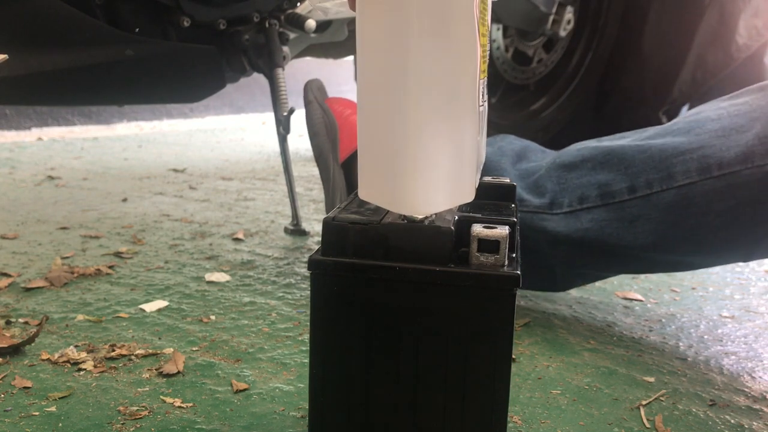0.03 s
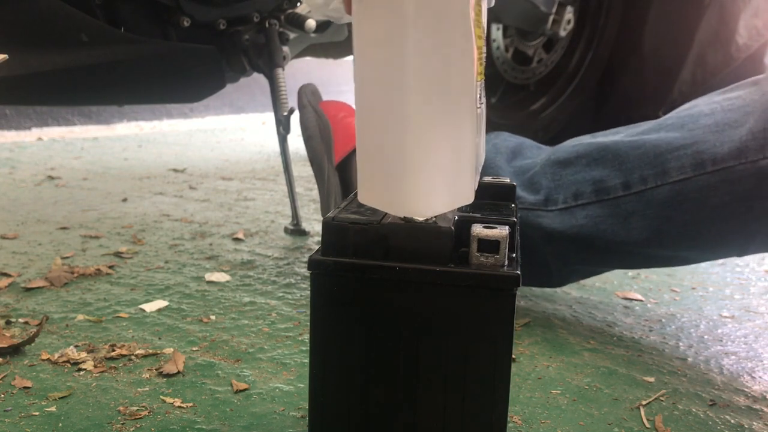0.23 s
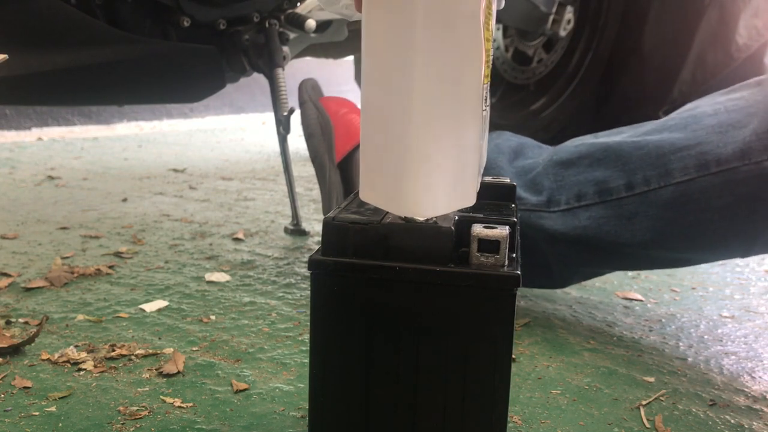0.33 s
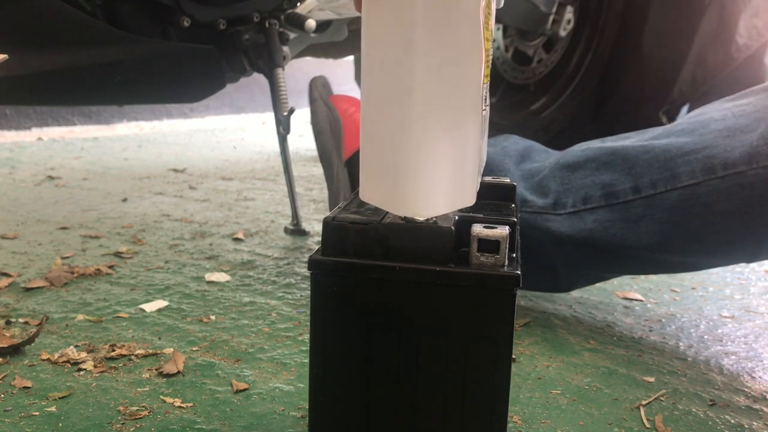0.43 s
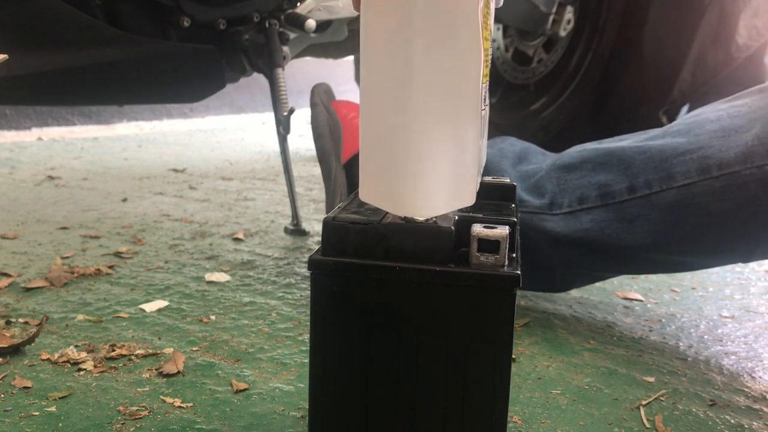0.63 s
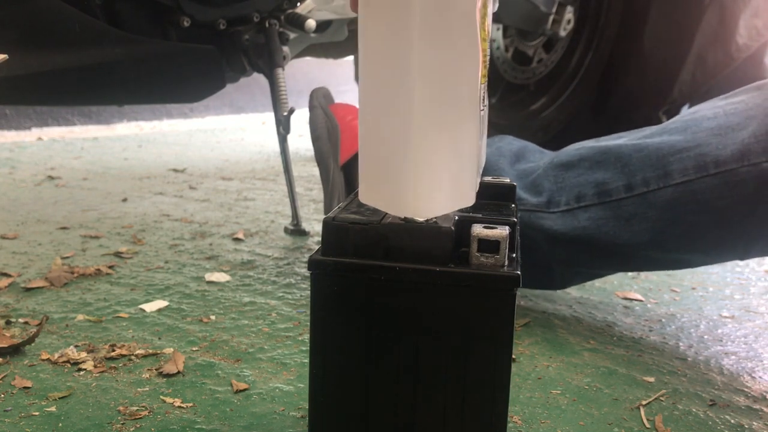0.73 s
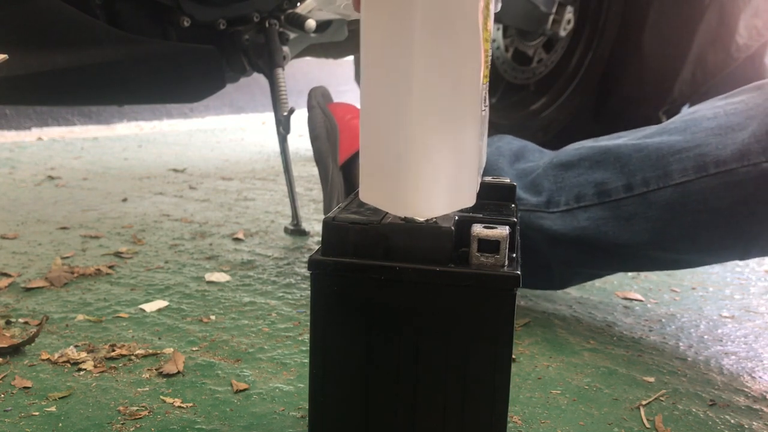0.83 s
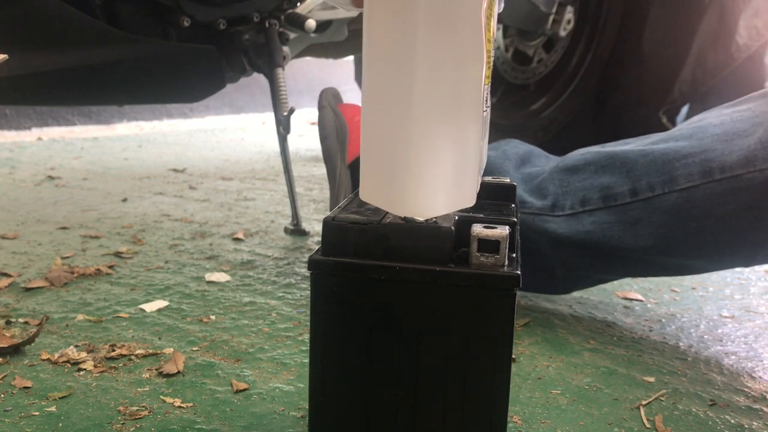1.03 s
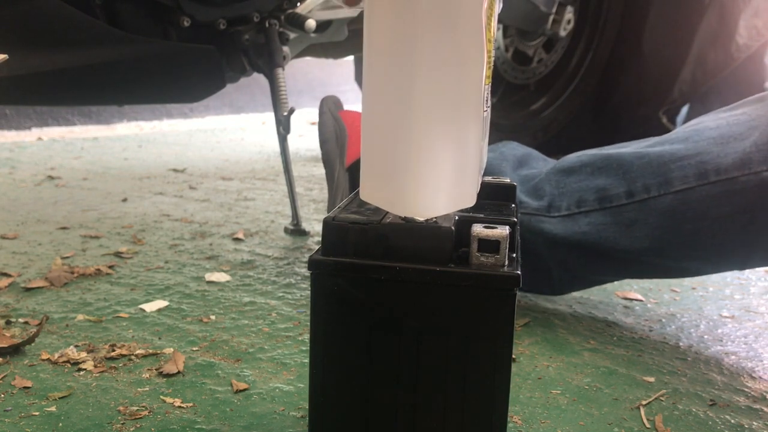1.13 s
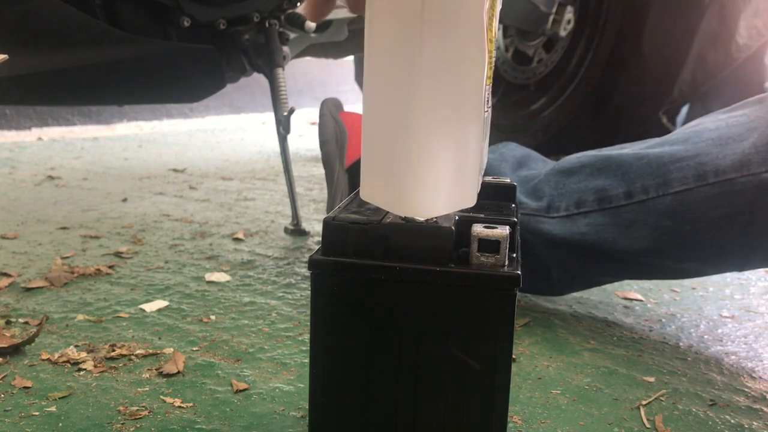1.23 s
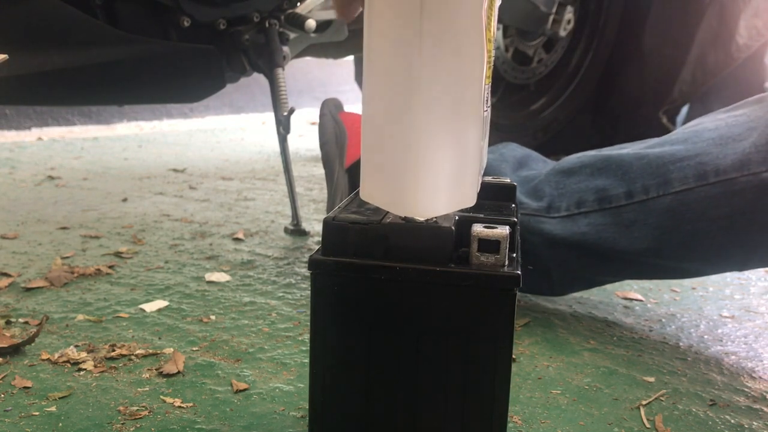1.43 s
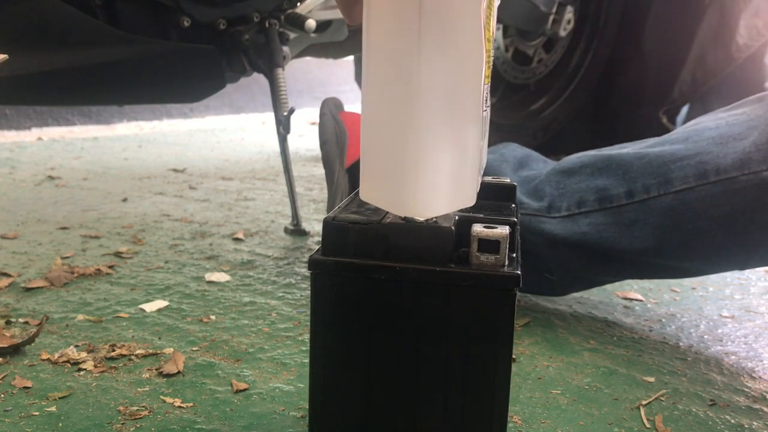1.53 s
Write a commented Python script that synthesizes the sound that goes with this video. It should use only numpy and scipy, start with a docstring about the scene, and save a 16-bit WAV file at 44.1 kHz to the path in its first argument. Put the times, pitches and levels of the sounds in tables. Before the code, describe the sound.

Foil seals burst with two sharp pops and thumps, followed by crackling, scraping plastic.

```python
"""Two foil seals pop as a plastic pack of acid bottles is pushed down onto a battery.
Each seal strains and rips, the hollow pack rings, and it drops with a thump.
Between and after the pops the plastic scrapes, snaps as it buckles and once faintly squeaks.
A small workshop adds a short echo; under it all lie a low rumble and dull handling noise."""
import sys
import numpy as np
from scipy import signal
from scipy.fft import rfft, irfft
from scipy.io import wavfile
from scipy.ndimage import uniform_filter1d

SR = 44100
rng = np.random.default_rng(int(sys.argv[2]) if len(sys.argv) > 2 else 0)


def bounce(signal):
    """Save signal as a 16-bit WAV file at the path given by the first command-line argument."""
    frames = np.transpose(np.atleast_2d(signal))
    limited = np.clip(frames, -1, 1)
    pcm = np.round(limited * 32767).astype(np.int16)
    wavfile.write(sys.argv[1], SR, pcm)


N = 70560

# Tone of the steady rumble and hiss: f/Hz, relative level/dB
RUMBLE_SPECTRUM = [(20, -41), (35, -11), (60, 1.5), (85, 1.5), (140, -4.5), (190, -11.5), (260, -12.5),
                   (330, -18.5), (450, -24.5), (870, -28), (1500, -32), (2100, -36), (4000, -40),
                   (6000, -44.5), (16000, -55.5)]
# Tone of the pack shifting in the hands: f/Hz, relative level/dB
HANDLING_SPECTRUM = [(30, -32), (80, -23.5), (120, 4), (280, -4.5), (500, -22.5), (1200, -32), (4000, -64)]
# How loud that shifting is over time: t/s, level/dB
HANDLING_LEVELS = [(0, -43), (.5, -39), (.62, -42), (.72, -88), (1.0, -35), (1.3, -39), (1.6, -38)]
# How long the room echoes: f/Hz, time to fade by 60 dB/s
ROOM_FADE_TIMES = [(100, 0.55), (400, 0.11), (1400, 0.32), (4200, 0.28), (8000, 0.22), (16000, 0.19)]
# Notes at which the hollow pack rings: f/Hz, relative level/dB, time to fade by 60 dB/s
PACK_NOTES = [(1170, -7, 0.067), (1327, -8, 0.02), (1470, 4, 0.037), (1706, -5, .03), (1925, 2.5, 0.075),
              (2592, -1, 0.11), (3434, -11.5, 0.12), (4210, -10, 0.057), (4720, -7, 0.026)]
# Tone of the scraping and snapping plastic: f/Hz, relative level/dB
PLASTIC_SPECTRUM = [(150, -23), (500, -19), (1200, -1), (2200, -3.5), (3300, 1), (4500, -2.5), (7000, -1.5),
                    (10000, -5.5), (16000, -13.5)]
# A bottle neck squeaks: t/s, length/s, f/Hz, band width/Hz, level/dB
NECK_SQUEAK = (1.41, .16, 4180, 170, -51)
# The pack slides: t/s, length/s, level/dB, extra treble/dB
SCRAPE_STROKES = [(0, 0.064, -41.5, 0), (0.38, 0.176, -56, -6), (0.53, 0.091, -43, 1),
                  (1.061, 0.147, -46.5, -1.5), (1.195, 0.161, -41, -10), (1.391, 0.18, -44.5, -7)]
# The plastic buckles: t/s, relative level/dB, f/Hz of the buckling spot, extra treble/dB
PLASTIC_SNAPS = [(.0055, -18, 1430, 3), (0.051, -34, 5760, 13), (0.3346, -17, 4430, -2),
                 (0.345, -28, 4650, 2), (0.5268, -30, 4460, -2), (0.5518, -20, 4700, 1),
                 (.5545, -23.5, 4400, 6), (0.579, -22.5, 4360, 3), (.604, -27, 3220, -9),
                 (0.617, -29.5, 4450, -6), (0.8919, -20, 4430, -3), (1.0209, -25, 4400, -12),
                 (1.046, -29.5, 1400, -10), (1.0505, -27.5, 1800, -6), (1.073, -30.5, 2650, -7.5),
                 (1.1121, -21, 5700, -5), (1.124, -25, 3380, 10), (1.1283, -23.5, 5670, -5),
                 (1.1602, -24.5, 5300, 4), (1.165, -28.5, 9000, 9), (1.1885, -18, 5830, 7),
                 (1.202, -17.5, 8000, 16), (1.2088, -18, 2960, -2), (1.2237, -9.5, 4300, 5),
                 (1.2524, -15.5, 6800, -2), (1.2559, -16, 6600, 16), (1.2653, -14.5, 3140, 5),
                 (1.2791, -18, 11300, -1), (1.2905, -20.5, 9500, 5), (1.3128, -18.5, 1370, 9),
                 (1.3226, -47, 6700, 6), (1.328, -15.5, 6840, 9), (1.3363, -14.5, 6700, 11),
                 (1.3415, -17.5, 6950, -12), (1.3456, -23, 4150, 1), (1.3878, -18, 3220, 4),
                 (1.4105, -44, 1400, -8), (1.424, -23, 5400, 6), (1.437, -37, 4000, 1),
                 (1.5004, -19.5, 5440, 1.5), (1.5555, -27, 4030, 0), (1.57, -28.5, 2660, -13.5),
                 (1.585, -32.5, 6750, 11)]
# The pack lands and knocks: t/s, level/dB, f/Hz, swell/s, decay/s
PACK_THUMPS = [(0.2199, -8, 239, 0.0015, 0.0028), (0.2371, -14.5, 160, 0.0016, .003),
               (.780, -13, 287, 0.00096, .0015), (.7998, -22, 200, 0.0014, 0.0021),
               (0.805, -20, 232, 0.00075, .002), (1.3173, -26.5, 287, 0.0022, 0.0042)]
# Tone of the tearing foil: f/Hz, relative level/dB
FOIL_SPECTRUM = [(100, -1.5), (380, -3), (600, -17), (880, -3.5), (1080, -10.5), (1350, 0.5), (1700, -5.5),
                 (2300, -6), (4300, 0), (5100, -4), (7500, -5), (11000, -10.5), (16000, -18.5)]
# The seals rip: t/s, length/s, level/dB, strain beforehand/s, strain level/dB, ring level/dB,
# treble tilt/(dB per octave). The strain and ring levels are relative to the rip.
SEAL_POPS = [(0.2103, 0.0098, -9.5, .012, -17.5, -11.5, 0.16), (0.7728, 0.0057, -8.5, .0065, -21, -16, 0.5)]

RUMBLE_DB, TOP_HZ = -34.5, 16100
NEAR_DB, NEAR_FALL_S, TAIL_DB, TAIL_DELAY_S = -7.5, 0.0063, -9, 0.0073
STROKE_FADE_S, TREBLE_HZ, CRACKLE_RING_DB = 0.0077, 7600, -26
SLIPS_PER_S, SLIP_FALL_S, SLIP_DB = 330, 0.00071, 2
SNAP_DB, SNAP_RISE_S, SNAP_FALL_S = -8.5, 0.0006, 0.0026
SPOT_DB, SPOT_WIDTH_SHARE, SPOT_UNEVEN_DB = 10.5, 0.069, 2.6
STRAIN_RISE_S, RIP_START_DB, RIP_RISE_S, RIP_FALL_S = 0.0021, -7, 0.0011, 0.003


def amp(db):
    """Turns decibels into a number to multiply by."""
    return 10 ** (np.asarray(db) / 20)


def unit(x):
    """Scales a signal to an average strength (rms) of 1."""
    return x / np.sqrt(np.mean(x ** 2) + 1e-20)


def read(points, hz):
    """Looks up frequencies in a table, blending between rows on a pitch-like (log) scale."""
    f, value = np.transpose(points)
    return np.interp(np.log(hz + 1), np.log(np.abs(f) + 1), value)


def add(mix, s, sound):
    """Mixes a sound in, starting at s seconds."""
    part = mix[max(round(s * SR), 0):][:len(sound)]
    part += sound[:len(part)]


def colour(x, spectrum, extra_db=0):
    """Gives a noise the tone of a spectrum table, at strength 1."""
    hz = np.fft.rfftfreq(len(x), 1 / SR)
    return unit(irfft(rfft(x) * amp(read(spectrum, hz) + extra_db), len(x)))


def treble(size):
    """How much each frequency counts as treble, from 0 to 1."""
    return 1 - 1 / (1 + (np.fft.rfftfreq(size, 1 / SR) / TREBLE_HZ) ** 4)


def stroke(start, length):
    """Loudness of one rub: it fades in, holds and fades out."""
    t = np.arange(N) / SR
    return np.clip(np.minimum(t - start, start + length - t) / STROKE_FADE_S, 0, 1)


def burst(shape, spectrum, extra_db):
    """A crack: noise with a given tone, whose loudness follows shape."""
    gain = amp(read(spectrum, np.fft.rfftfreq(len(shape), 1 / SR)) + extra_db)
    phase = np.angle(rfft(rng.standard_normal(len(shape)) * shape))
    noise = irfft(gain * np.exp(1j * phase))
    power = np.abs(uniform_filter1d(noise ** 2, size=130))
    return shape * noise / np.sqrt(power + 1e-12)  # even out the noise, then shape it


def background():
    """Steady low rumble and hiss, and the dull shifting of the pack in the hands."""
    rumble = amp(RUMBLE_DB) * colour(rng.standard_normal(N), RUMBLE_SPECTRUM)
    handling_db = np.interp(np.arange(N) / SR, *np.transpose(HANDLING_LEVELS))
    return rumble + amp(handling_db) * colour(rng.standard_normal(N), HANDLING_SPECTRUM)


def room(x):
    """Sound bounces off the battery and floor, then each band of the echo fades at its own speed."""
    t = np.arange(SR // 10) / SR
    near = rng.standard_normal(len(t)) * (t > .002) * np.exp(-t / NEAR_FALL_S)
    out = x + amp(NEAR_DB) * signal.fftconvolve(x, near / np.linalg.norm(near))[:N]
    frames = dict(nperseg=256, noverlap=192)
    hz, _, bands = signal.stft(x, SR, **frames)
    kept = amp(-60 * 64 / SR / read(ROOM_FADE_TIMES, hz)) ** 2  # power left after each 64-sample step
    power = np.array([signal.lfilter([1 - k], [1, -k], np.abs(b) ** 2) for k, b in zip(kept, bands)])
    hiss = signal.stft(rng.standard_normal(N), SR, **frames)[2]
    tail = signal.istft(np.sqrt(power) * hiss / np.std(hiss), SR, **frames)[1][:N]
    add(out, TAIL_DELAY_S, amp(TAIL_DB) * tail)
    return out


def pack_ring(x):
    """Shaken by the sound x, the hollow pack rings at its own notes."""
    t = np.arange(SR // 4) / SR
    ring = sum(amp(db - 60 * t / fade_s) * np.cos(2 * np.pi * hz * t) for hz, db, fade_s in PACK_NOTES)
    return signal.fftconvolve(x, ring / np.linalg.norm(ring))[:N]


def squeak():
    """Plastic rubs on plastic and sings faintly: noise squeezed around one pitch."""
    start, length, hz, width_hz, db = NECK_SQUEAK
    band = 1 / (1 + (2 * (np.fft.rfftfreq(N, 1 / SR) - hz) / width_hz) ** 2)
    squeal = unit(irfft(rfft(rng.standard_normal(N)) * band, N))
    return amp(db) * stroke(start, length) * squeal


def scrapes():
    """The bottle necks slide into the battery with a hiss, roughened by tiny slips."""
    out = np.zeros(N)
    slips = (rng.random(N) < SLIPS_PER_S / SR) * np.minimum(rng.exponential(1, N), 2)
    fading_slips = signal.lfilter([1], [1, -np.exp(-1 / (SLIP_FALL_S * SR))], slips)
    hiss = rng.standard_normal(N) * (1 + amp(SLIP_DB) * unit(fading_slips))
    for start, length, db, treble_db in SCRAPE_STROKES:
        out += amp(db) * stroke(start, length) * colour(hiss, PLASTIC_SPECTRUM, treble_db * treble(N))
    return out


def snaps():
    """The plastic buckles in short cracks; each spot favours its own pitch."""
    out, t = np.zeros(N), np.arange(1024) / SR
    hz = np.fft.rfftfreq(len(t), 1 / SR)
    shape = np.clip(t / SNAP_RISE_S, 0, 1) * np.exp(-np.maximum(t - 2 * SNAP_RISE_S, 0) / SNAP_FALL_S)
    for start, db, spot_hz, treble_db in PLASTIC_SNAPS:
        peak_db = SPOT_DB / (1 + ((hz / spot_hz - 1) / SPOT_WIDTH_SHARE) ** 2)
        ripple_db = SPOT_UNEVEN_DB * unit(uniform_filter1d(rng.standard_normal(len(hz)), size=10))
        tone_db = peak_db + ripple_db + treble_db * treble(len(t))
        add(out, start, amp(db + SNAP_DB) * burst(shape, PLASTIC_SPECTRUM, tone_db))
    return out


def thumps():
    """Each time the pack lands or knocks, a low note swells and dies almost at once."""
    out, t = np.zeros(N), np.arange(-.01, .05, 1 / SR)
    for peak_s, db, hz, swell_s, decay_s in PACK_THUMPS:
        shape = np.where(t < 0, np.exp(-(t / swell_s) ** 2 / 2), np.exp(-np.abs(t) / decay_s))
        add(out, peak_s + t[0], -amp(db) * shape * np.cos(2 * np.pi * hz * t))
    return out


def pops():
    """Each foil seal rustles under strain, then rips in a swelling burst that makes the pack ring."""
    out, t = np.zeros(N), np.arange(4096) / SR
    octaves = np.log2(np.maximum(np.fft.rfftfreq(len(t), 1 / SR), 500) / 4000)
    for start, length, db, strain_s, strain_db, ring_db, tilt_db in SEAL_POPS:
        rip_t = t - strain_s  # negative until the foil gives way
        strain_shape = np.minimum(t / STRAIN_RISE_S, 1) * (rip_t < 0)
        strain = amp(strain_db) * strain_shape * colour(rng.standard_normal(len(t)), FOIL_SPECTRUM)
        swell = amp(RIP_START_DB * (1 - np.clip(2 * rip_t / length, 0, 1)))
        fades = np.exp(np.minimum(rip_t, 0) / RIP_RISE_S - np.maximum(rip_t - length, 0) / RIP_FALL_S)
        rip = burst(swell * fades, FOIL_SPECTRUM, tilt_db * octaves)
        pop = np.zeros(N)
        add(pop, start - strain_s, amp(db) * (strain + rip))
        out += pop + amp(ring_db) * pack_ring(pop)
    return out


def scene():
    """Pops, thumps and crackle echo in the room, over the background, in one channel."""
    crackle = snaps() + scrapes() + squeak()
    pack = pops() + thumps() + crackle + amp(CRACKLE_RING_DB) * pack_ring(crackle)
    return (room(pack) + background())[None]


def record(dry):
    """Flattens any peaks beyond full scale, then removes the highest treble."""
    clipped = np.clip(dry, -1, 1)
    low_pass = signal.firwin(511, TOP_HZ, window=("kaiser", 9), fs=SR)
    return signal.oaconvolve(clipped, low_pass[None], "same")


dry = scene()
out = record(dry)
bounce(out)
```